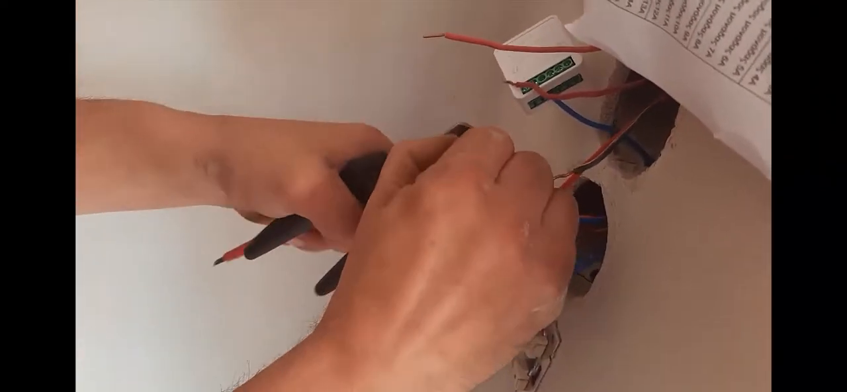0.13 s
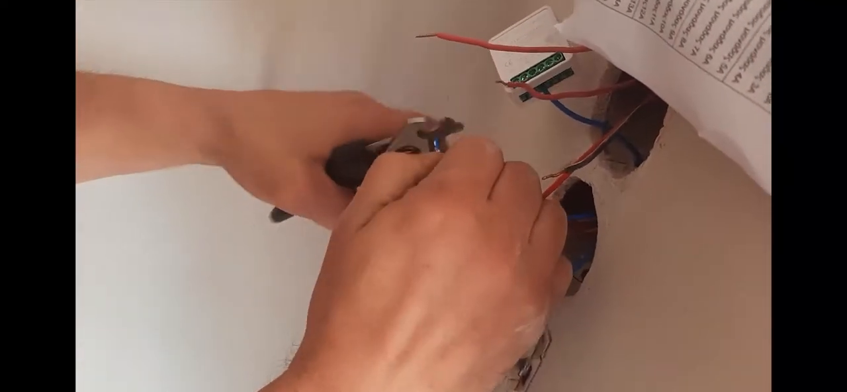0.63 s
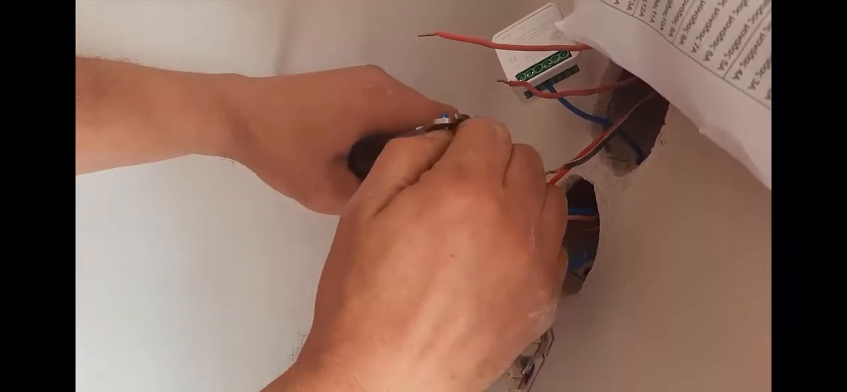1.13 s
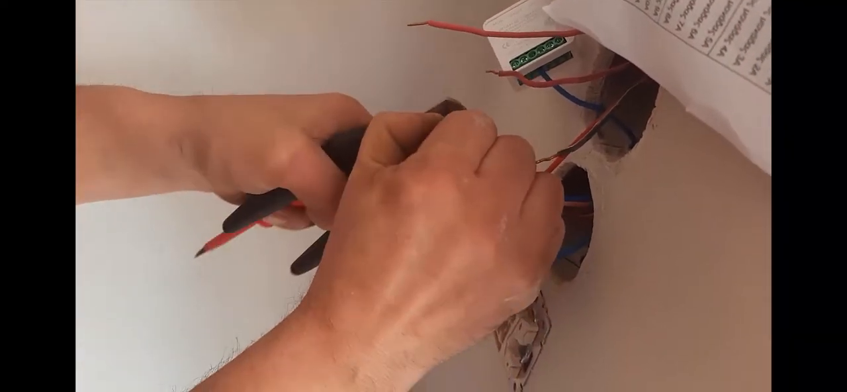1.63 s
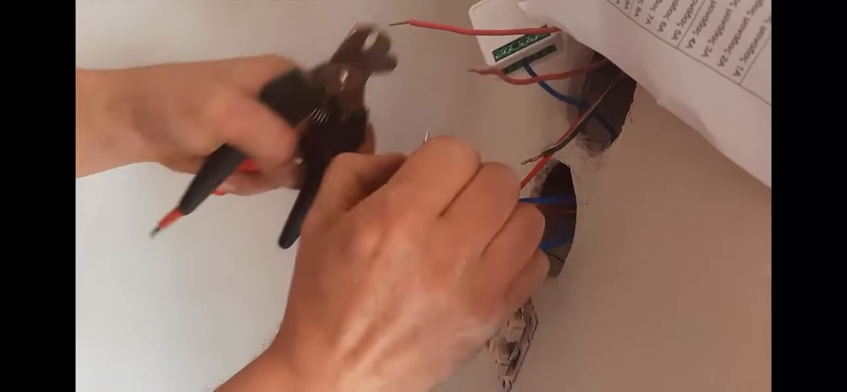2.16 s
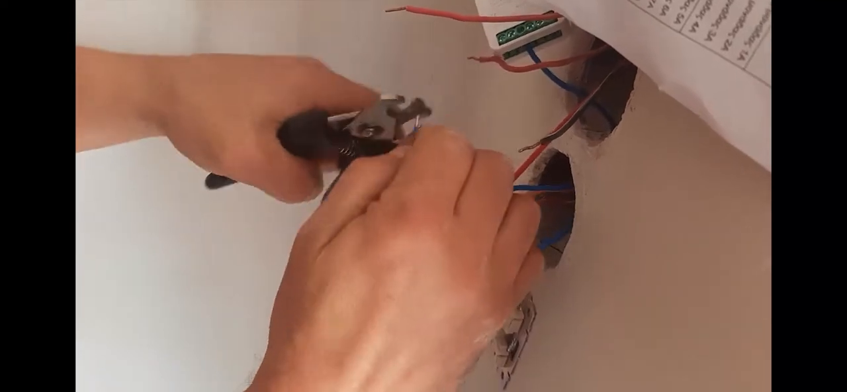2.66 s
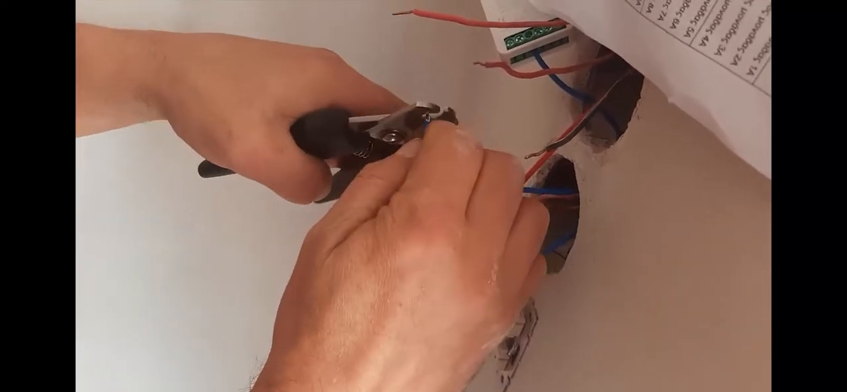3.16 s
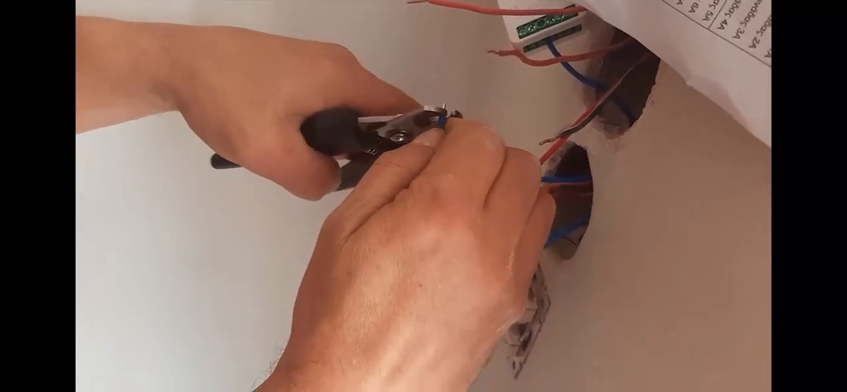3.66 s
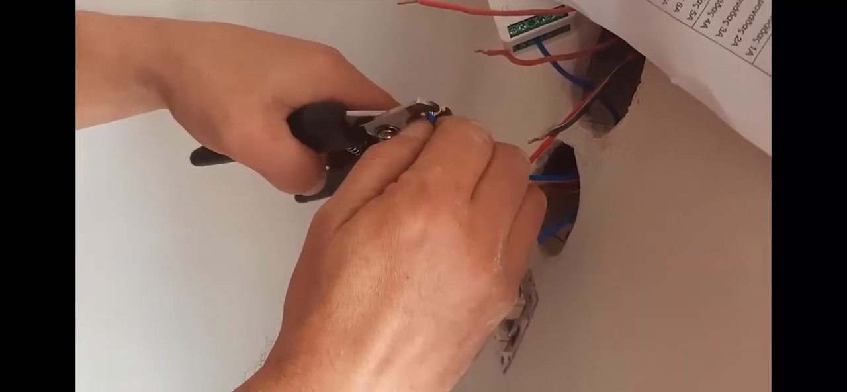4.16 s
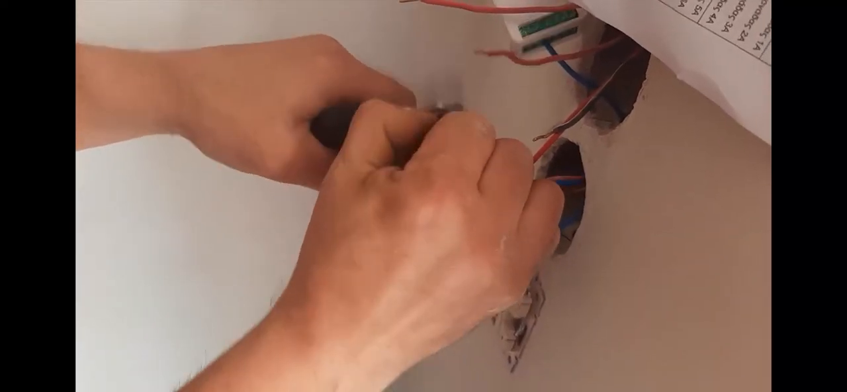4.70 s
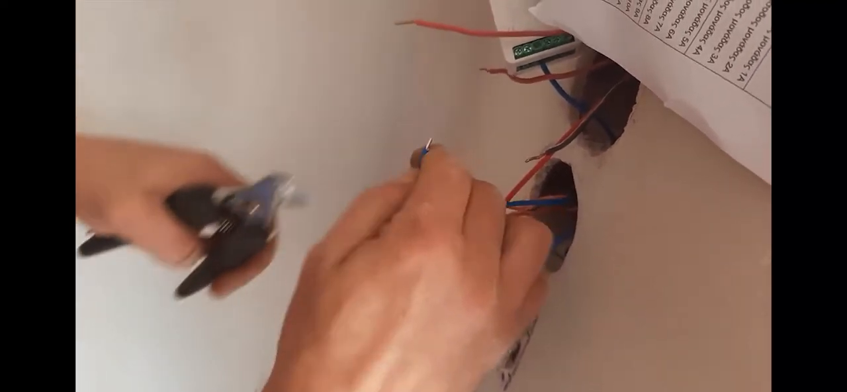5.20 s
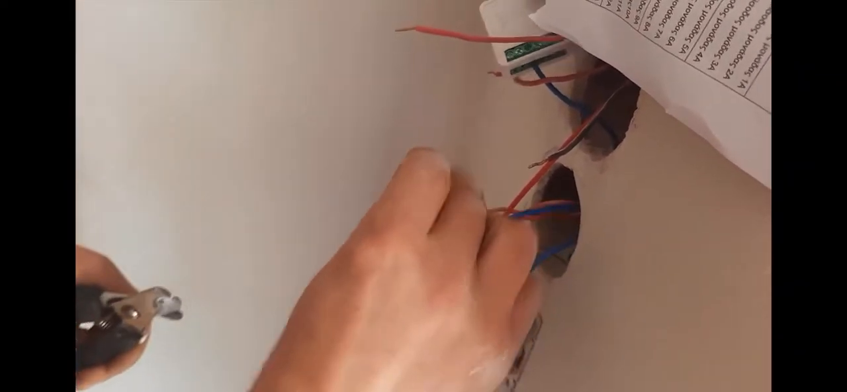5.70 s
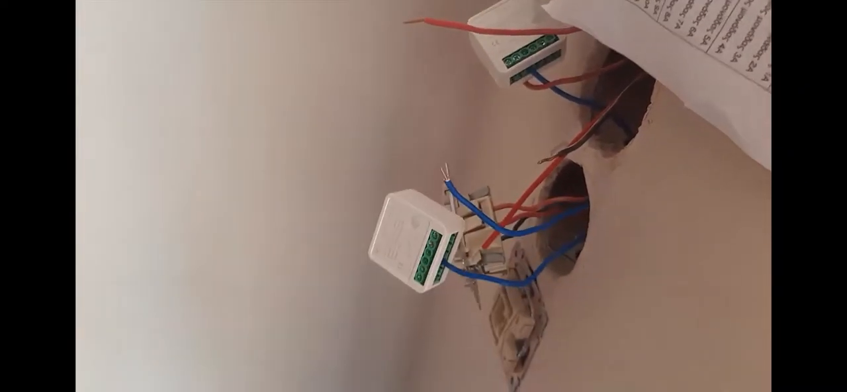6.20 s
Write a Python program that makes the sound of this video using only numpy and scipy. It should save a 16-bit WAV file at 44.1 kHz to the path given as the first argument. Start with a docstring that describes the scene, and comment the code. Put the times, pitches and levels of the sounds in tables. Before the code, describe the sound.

Close, sparse clicks, scrapes and hollow plastic knocks from electrical wiring work with pliers, bursts around two and five seconds over faint building rumble.

```python
"""Bare, hard room: pliers strip and crimp wires at a wall box, close to a phone with two unlike microphones.
Knocks and drag excite decaying box modes near 2 kHz and its odd multiples, mostly in the left microphone.
Ticks (noise snap plus short ring) and rubbing (hiss plus crackle) come through the air, brighter on the right.
Shaped noise gives the low rumble and hum of the building, swelling with thumps of handling; slow sines give
dull bumps of the hand."""
import sys
import numpy as np
from scipy import signal
from scipy.io import wavfile
from scipy.ndimage import uniform_filter1d

SR = 44100
rng = np.random.default_rng(int(sys.argv[2]) if len(sys.argv) > 2 else 0)


def volts(x):
    """Linear amplitude factor 10**(x/20) for a level x in dB, scalar or array-like."""
    e = np.asarray(x, float) / 20
    return 10 ** e


def file_out(sig):
    """Save sig as 16-bit WAV at sys.argv[1]."""
    # one column per channel
    cols = np.atleast_2d(sig).T
    # limit, then scale
    lim = np.clip(cols, -1, 1)
    pcm = np.round(lim * 32767).astype(np.int16)
    wavfile.write(sys.argv[1], SR, pcm)


N = 279153

# colour of rubbing and clatter in air: f/Hz, level/dB
RUSTLE_SPECTRUM = [(100, -3), (400, -18.5), (1200, -4.5), (3000, -4), (16000, -7.5)]
# left-right likeness of the noise layers: f/Hz, correlation/1
LIKENESS = [(60, .8), (200, 0.45), (400, 0.53), (700, 0.74), (1200, 0.091), (20000, .01)]
# faint handling between the pulls: t/s, rustle level/dB, drag level/dB
FAINT_HANDLING = [(0.0, -61.5, -86), (.85, -100, -85), (.95, -68.5, -84), (1.34, -75.5, -69.5),
                  (1.7, -73, -70.5), (1.92, -63.5, -70), (2.45, -70.5, -79), (2.9, -68, -78.5),
                  (3.85, -77.5, -81), (4.0, -73, -76), (4.32, -68.5, -95.5), (4.5, -74.5, -80.5),
                  (5.3, -70, -65), (6.33, -66.5, -69)]


def unit_rms(x):
    """Scales to rms 1."""
    return x / np.sqrt(np.mean(x ** 2) + 1e-20)


def spectrum_at(points, hz):
    """Table value at hz, interpolated over log frequency."""
    f, value = np.transpose(points)
    return np.interp(np.log(hz + 1), np.log(f + 1), value)


def curve(rows, column):
    """One dB column over time as a gain per sample."""
    rows = np.array(rows)
    return volts(np.interp(np.arange(N) / SR, rows[:, 0], rows[:, column]))


def add(mix, start_s, sound):
    """Mixes a sound in at start_s."""
    part = mix[max(round(start_s * SR), 0):][:len(sound)]
    part += sound[:len(part)]


def causal(points, size=2048):
    """Minimum-phase impulse response of a spectrum table."""
    hz = abs(np.fft.fftfreq(2 * size, 1 / SR))
    log_gain = np.log(volts(spectrum_at(points, hz)))
    return np.fft.ifft(np.exp(np.conj(signal.hilbert(log_gain)))).real[:size]


def through(x, taps):
    """Convolution cut to input length."""
    return signal.oaconvolve(x, taps)[:len(x)]


def shaped(points, patchy_db, likeness, size=1024):
    """Stereo noise of rms 1 from random short-time spectra with drifting patches; the shared part lags on the right."""
    lag_s = 0.00033
    frames, hz = 4 * N // size + 5, np.fft.rfftfreq(size, 1 / SR)
    a, b, c, d, patches = rng.standard_normal((frames, len(hz), 5)).T
    patches = uniform_filter1d(patches, 14, 0)  # over frequency
    patches = unit_rms(uniform_filter1d(patches, 18, 1))  # over time
    same = np.clip(spectrum_at(likeness, hz), -1, 1)[:, None]
    left = a + 1j * b
    lag = np.exp(-2j * np.pi * hz[:, None] * lag_s)
    right = lag * same * left + np.sqrt(1 - same ** 2) * (c + 1j * d)
    z = np.array([left, right])
    z *= volts(spectrum_at(points, hz)[:, None] + patchy_db * patches)
    noise = signal.istft(z, nperseg=size, noverlap=3 * size // 4)[1]
    return unit_rms(noise[:, :N])


def grains(per_s, spread_db):
    """Random stick-slip clicks, a few of them large; rms 1."""
    size_db = spread_db * np.minimum(rng.exponential(1, N), 4)
    size = volts(size_db) * rng.choice([-1, 1], N)
    return unit_rms(size * (rng.random(N) < per_s / SR))


def strokes(layer):
    """Gain of one layer of the pulls (0 rustle, 1 drag, 2 boom): fast rise, hold, decay linear in dB."""
    # pulls of hands and wire: t/s, hold/s, rustle in air level/dB, drag on the box level/dB, dull boom level/dB
    pulls = [(0.0, 0.0074, -51, -52, -58), (0.133, 0.087, -66, -76, -98), (0.337, 0.16, -57, -78, -71),
             (0.595, 0.022, -61, -78, -64), (0.712, 0.085, -64, -60, -95), (1.38, .01, -58, -70, -89),
             (1.442, 0.0078, -62.5, -81, -71), (1.869, 0.013, -72, -77, -58.5),
             (1.956, 0.049, -42.5, -59, -54.5), (2.152, 0.029, -37, -41, -50), (2.56, 0.046, -66, -58, -98),
             (4.67, 0.067, -66.5, -64, -72), (4.76, 0.08, -45.5, -41.5, -56),
             (4.949, 0.0096, -50, -59.5, -80), (5.078, 0.036, -54, -55, -74),
             (5.164, 0.03, -62.5, -65, -68), (5.407, 0.043, -65, -56, -80), (5.6, 0.0087, -57.5, -64, -63),
             (5.726, 0.0063, -45, -63, -70), (5.872, 0.026, -64, -67, -93), (6.042, 0.15, -56.5, -69, -62),
             (6.24, 0.046, -62.5, -77, -80)]
    # decay rates: rustle/(dB/s), drag/(dB/s), boom/(dB/s)
    fall_db_per_s = [198, 130, 150]
    rise_db_per_s = 1102.5
    t, gain = np.arange(0, N, 64) / SR, 0
    for s, hold_s, *db in pulls:
        rise_db = rise_db_per_s * np.maximum(s - t, 0)
        fall_db = fall_db_per_s[layer] * np.maximum(t - s - hold_s, 0)
        gain = gain + volts(db[layer] - rise_db - fall_db)
    return np.interp(np.arange(N) / SR, t, gain)


def room(x):
    """Sparse random-sign taps, each band with its own decay; three random tails take turns at a steady rate,
    so that the echo colour varies."""
    # decay: f/Hz, t60/s, t60 of the rooms beyond/s
    decay = np.array([(303, 0.31, 1.5), (940, 0.74, 0.61), (1500, 0.31, 0.86), (2000, 0.28, 2),
                      (2700, 0.31, 1.2), (6000, 0.26, 1.9), (13000, 0.25, .9)])
    beyond_db, turns_per_s = -25, 7
    taps = np.zeros((3, 2, SR))
    at = np.arange(200, SR - 20, 20) + rng.integers(0, 20, (3, 2, (SR - 201) // 20))
    np.put_along_axis(taps, at, rng.choice([-1., 1.], at.shape), 2)
    hz, t, z = signal.stft(taps, SR, nperseg=256)
    near_s, far_s = (spectrum_at(decay[:, [0, k]], hz)[:, None] for k in (1, 2))
    envelope = volts(-60 * t / near_s) + volts(beyond_db - 60 * t / far_s)
    tails = signal.istft(z * envelope, SR, nperseg=256)[1]
    tails /= np.linalg.norm(tails, axis=2, keepdims=True)
    phase = np.arange(N) * turns_per_s / SR + np.arange(3)[:, None] / 3
    turn = np.sqrt(2 / 3) * np.cos(2 * np.pi * phase)
    return sum(signal.oaconvolve(x * w, tail, axes=1)[:, :N] for w, tail in zip(turn, tails))


def building_and_thumps():
    """Low rumble and hum of the building as noise, swelling with thumps of handling; pulls boom in the hum band."""
    # building and handling thumps: t/s, rumble level/dB, hum level/dB
    levels = [(0.0, -51.5, -61), (0.3, -72, -65), (0.46, -53.5, -57.5), (0.65, -66.5, -63.5),
              (0.9, -60, -59.5), (1.14, -60.5, -57.5), (1.3, -67, -62.5), (1.85, -66, -59.5),
              (1.97, -49.5, -50.5), (2.17, -66, -57.5), (2.3, -67, -61.5), (2.89, -64, -64),
              (3.0, -60, -59.5), (3.28, -64, -62), (3.6, -52.5, -60.5), (3.95, -63.5, -63),
              (4.65, -64.5, -61), (4.8, -47, -62.5), (4.95, -64.5, -59.5), (5.6, -63, -64),
              (6.15, -66.5, -61.5), (6.33, -71, -63.5)]
    # rumble colour: f/Hz, level/dB
    rumble_spectrum = [(25, -47.5), (50, -19), (70, -4.5), (83, 3), (100, -18), (130, -1.5), (200, -18),
                       (300, -28), (20000, -112)]
    # hum colour: f/Hz, level/dB
    hum_spectrum = [(100, -29), (220, -4), (380, 5), (550, -1.5), (800, -8.5), (1500, -20.5), (3000, -38),
                    (20000, -52)]
    rumble = curve(levels, 1) * shaped(rumble_spectrum, 0.98, LIKENESS, size=4096)
    hum_gain = curve(levels, 2) + strokes(2)
    return rumble + hum_gain * shaped(hum_spectrum, 0.98, LIKENESS)


def bumps():
    """Soft pushes of the hand: each swings a few low cycles under a t*exp(-t) envelope."""
    # dull bumps: t/s, level/dB, f/Hz
    pushes = [(1.949, -43, 125), (4.799, -56, 77), (5.162, -38, 70), (5.166, -43, 170)]
    out, t = np.zeros(N), np.arange(6000) / SR
    for s, db, hz in pushes:
        envelope = t / 0.038 * np.exp(1 - t / 0.01)
        add(out, s - .01, 2 * volts(db) * np.sin(2 * np.pi * hz * t) * envelope)
    return out


def resonate(x, hz, width_hz):
    """Moving resonance: shifts the hz curve to zero, smooths by a double pole and shifts back."""
    turn, r = np.exp(2j * np.pi * np.cumsum(hz) / SR), np.exp(-np.pi * width_hz / SR)
    smooth = signal.lfilter([(1 - r) ** 2], [1, -2 * r, r ** 2], x / turn)
    return 2 * (turn * smooth).real


def rubbing():
    """Patchy hiss and fine stick-slip crackle; the faint handling adds a drifting bright band."""
    # the band sinks and starts over: t/s, f/Hz
    band_centre = [(0.0, 4100), (0.85, 4850), (0.95, 3480), (1.3, 4330), (1.8, 4600), (2.5, 4620),
                   (3.141, 4370), (3.17, 3310), (3.3, 3100), (3.33, 5900), (3.42, 5230), (3.65, 2800),
                   (3.69, 5700), (4.08, 5200), (4.11, 4660), (4.4, 2700), (4.43, 5200), (6.33, 4600)]
    crackle_db, patchy_db, band_gain, band_width_hz = 1.5, 3.5, 1.5, 1100
    crackle = volts(crackle_db) * through(grains(per_s=820, spread_db=3.5), causal(RUSTLE_SPECTRUM))
    hiss = shaped(RUSTLE_SPECTRUM, patchy_db, LIKENESS) + crackle
    centre_hz = np.interp(np.arange(N) / SR, *np.transpose(band_centre))
    bright = hiss + band_gain * resonate(hiss, centre_hz, band_width_hz)
    return strokes(0) * hiss + curve(FAINT_HANDLING, 1) * bright


def ticks():
    """Wire ends: each a 1 ms snap of noise and a short decaying ring."""
    # small dry ticks: t/s, level/dB, ring f/Hz
    snaps = [(0.1545, -54, 4470), (0.1807, -51.5, 5860), (0.3345, -50, 4140), (0.37, -41.5, 7100),
             (0.46, -44.5, 5700), (0.469, -44, 5700), (0.5864, -47, 5780), (1.3666, -38.5, 6000),
             (1.458, -51.5, 5500), (1.8741, -48.5, 4900), (1.943, -37.5, 4330), (2.0007, -35, 5600),
             (2.0516, -26.5, 6650), (2.114, -40, 5500), (2.1346, -34.5, 5000), (2.1468, -27.5, 5750),
             (2.453, -54, 4900), (3.1504, -57, 4600), (3.7298, -62, 4600), (3.936, -52, 5010),
             (4.5571, -56.5, 4460), (4.6095, -54, 4500), (4.793, -43, 6040), (4.8234, -33, 6400),
             (4.8584, -43, 6130), (5.1002, -50, 5270), (5.336, -65, 5500), (5.5704, -48, 4570),
             (5.5999, -43.5, 4600), (5.7244, -43, 5570), (5.7546, -35, 3500), (6.0636, -45, 4900),
             (6.1097, -40, 5400), (6.134, -32.5, 6100), (6.169, -40, 5400)]
    # tick colour: f/Hz, level/dB
    snap_spectrum = [(300, -19.5), (2000, 6.8), (4000, 8.6), (16000, 11.5)]
    out, t = np.zeros(N), np.arange(300) / SR
    for (s, db, hz), noise in zip(snaps, rng.standard_normal((len(snaps), 300))):
        ring = 0.5 * np.sin(2 * np.pi * hz * t) * np.exp(-t / 0.0029)
        tick = noise * np.exp(-t / 0.00113) + ring
        add(out, s, volts(db) * tick / abs(tick).max())
    return through(out, causal(snap_spectrum))


def box_ring(favoured_hz=2000, body_db=0):
    """Decaying box modes at both microphones; the place struck favours some, body_db boosts those below 1.5 kHz."""
    # modes of the hollow box: f/Hz, width/Hz, left level/dB, right level/dB
    box_modes = [(1000, 280, 2.5, 1), (1305, 60, -4.5, -11), (1752, 64, -1, -2), (1850, 42, 0, -6.5),
                 (2000, 91, 11.5, -6), (2190, 79, 5.5, -2), (2313, 124, 7, 5.5), (2800, 350, -35.5, -10),
                 (4254, 300, -40, -44), (5780, 66, -20, -25), (9750, 127, -20.5, -36),
                 (13460, 170, -21, -55)]
    t = np.arange(1500) / SR
    f, width_hz, *db = np.transpose(box_modes)[:, :, None]
    off_place_db = np.minimum(((f - favoured_hz) / 60.) ** 2, 10.5)
    favour_db = (f < 1500) * body_db - (f < 2600) * off_place_db
    # neighbours start opposed: the ring swells, holds, then beats
    sign = (-1.) ** np.arange(len(box_modes))[:, None]
    envelope = np.exp(-np.pi * width_hz * t) * (1 - np.exp(-t / 0.00032))
    modes = sign * volts(favour_db) * envelope * np.sin(2 * np.pi * f * t)
    highpass = signal.butter(2, 650, "high", fs=SR, output="sos")
    return signal.sosfilt(highpass, (volts(db) * modes).sum(1))


def scrape():
    """Wire dragging on the box: stick-slip grains through its modes."""
    drag_gain = curve(FAINT_HANDLING, 2) + strokes(1)
    slips = drag_gain * grains(per_s=500, spread_db=5.5)
    ring = box_ring()
    return np.array([through(slips, r) for r in ring]) / np.linalg.norm(ring[0])


def knocks():
    """Box ring and clatter into the room: a hard first contact, then random chatter while contact lasts."""
    # pliers and wire on the box: t/s, ring level/dB, clatter level/dB, favoured f/Hz, boost of modes below 1.5 kHz/dB
    blows = [(0.0024, -40, -20, 2010, 11.5), (0.0147, -39, -38, 1830, -16), (0.1523, -49, -30, 2030, 7),
             (0.18, -42, -43, 2110, 7), (0.215, -43, -62, 1920, 4.5), (0.345, -50, -17, 1920, -4),
             (0.372, -33.5, -13.5, 1880, -5), (0.3925, -31, -10, 1970, 2.5), (0.402, -34, -43, 2000, 5.5),
             (0.4312, -31.5, -47, 2100, 0), (0.443, -36, -10.5, 2130, 2), (0.4625, -34, -44, 2040, -18),
             (0.4733, -50, -33, 2000, 6), (0.587, -46.5, -30, 2170, 11), (0.737, -45, -22.5, 1900, 5),
             (0.777, -53, -60, 2120, -2), (0.7896, -50, -21.5, 1800, 5), (1.323, -56, -49, 1810, 4),
             (1.3675, -24, -24, 1877, -2), (1.4583, -31.5, -50, 2080, 2), (1.941, -28, -21, 2090, 9),
             (1.9554, -21.5, -30.5, 2173, 4.5), (1.963, -31, -43, 2150, 1.5), (1.9714, -44, -6.5, 2230, 4),
             (1.9882, -48, -6, 2080, -4), (2.0002, -27, -42, 2190, 1.5), (2.03, -34.5, -2.5, 2190, -1),
             (2.051, -29.5, -36.5, 2475, -7), (2.112, -35.5, -17.5, 2120, -6),
             (2.121, -31.5, -32, 2000, -3), (2.135, -14, -48, 2047, -2.5), (2.1424, -20, -31, 1850, -18),
             (2.165, -24, -37.5, 1970, -2), (2.2404, -29.5, -10.5, 2157, -24),
             (2.452, -46, -24, 2150, -7.8), (2.565, -43, -33, 2150, 4), (3.824, -61, -36, 2270, 8),
             (3.845, -63, -49, 2200, -4), (4.006, -57.5, -46, 2130, -1), (4.03, -63, -50, 2145, -7),
             (4.56, -58.5, -33.5, 2260, -3), (4.67, -47.5, -23.5, 2140, 9), (4.7295, -40, -10.5, 2020, 12),
             (4.756, -35.5, -42, 1880, 6), (4.7664, -38, -39, 2190, 6), (4.7925, -27, -23, 1800, -7),
             (4.802, -31, -3, 2060, -8), (4.8194, -28, -39.5, 1840, -9), (4.8543, -49, -11.5, 2000, -4),
             (4.875, -44, -36, 1850, -6), (4.9447, -45, -21, 1830, -13), (4.959, -38.5, -33, 1890, 6),
             (5.0766, -44.5, -19, 2250, 11), (5.1005, -55, -18, 1850, -1), (5.1377, -50, -34, 1960, -1),
             (5.16, -35.5, -48, 2167, 1.5), (5.312, -47, -22.5, 2230, 8), (5.3903, -38, -21.5, 2120, -0.5),
             (5.526, -41.5, -21, 1700, 1), (5.5683, -46.5, -53, 2400, 3), (5.6, -42.5, -38, 1740, 0),
             (5.7245, -41, -42, 2250, -4), (5.7444, -52, -17, 2200, 6), (5.754, -38, -17, 1730, 8),
             (5.972, -50, -21, 1020, 12), (6.0362, -55, -9, 1940, -10), (6.2637, -51, -50, 2280, -1)]
    contact_s, contact_spread_db, bounce_db = 0.0059, 1.5, -6.5
    lead_s = 0.0007
    box, clatter, t = np.zeros((N, 2)), np.zeros(N), np.arange(600) / SR
    chance = rng.standard_normal((len(blows), 2, 600))
    for (s, db, clatter_db, hz, body_db), (gate, size) in zip(blows, chance):
        length_s = contact_s * volts(contact_spread_db * size[0])
        chatter = volts(bounce_db) * size * (gate > 2.1) * np.exp(-(t / length_s) ** 2)
        chatter[0] = 0.68  # first contact
        ring = signal.oaconvolve(chatter[None], box_ring(hz, body_db), axes=1)
        add(box, s - lead_s, 2 * volts(db) * ring.T / abs(ring[0]).max())
        add(clatter, s - lead_s, volts(clatter_db) * chatter / np.linalg.norm(chatter))
    return box.T, clatter


def scene():
    """The box path keeps its own colour; all else passes the microphone ports."""
    # left microphone colour for sound in air: f/Hz, gain/dB
    left_port = [(40, -5), (400, -4), (800, -14), (1400, -6), (2000, 6), (2500, -7.5), (3200, -38.5),
                 (4600, -19), (5300, -36), (5900, -32), (7500, -57), (9800, -22), (11500, -41),
                 (13500, -27), (16000, -35)]
    # right microphone colour for sound in air: f/Hz, gain/dB
    right_port = [(40, -7.5), (100, -24), (200, -12.5), (330, -3), (3000, 2), (5000, 2.5), (5800, 6),
                  (7000, -6), (7700, -13), (16000, -11.5)]
    right_lag_s = 0.006
    box, clatter = knocks()
    # the right microphone faces away and hears a wall echo first
    late = np.r_[np.zeros(round(right_lag_s * SR)), 1]
    box = box + scrape()
    box = np.array([box[0], through(box[1], late)])
    box = box * volts([[-.1], [-6]]) + room(box) * volts([[-9], [1.1]])  # left, right
    clatter, snaps = through(clatter, causal(RUSTLE_SPECTRUM)), ticks()
    wet = room(np.array([clatter, through(clatter, late)]) + volts(-6.5) * snaps)
    air = snaps + wet + rubbing() + building_and_thumps() + bumps()
    return box + np.array([through(air[0], causal(left_port)), through(air[1], causal(right_port))])


def top_cut(x):
    """Nothing passes above the cut-off."""
    return signal.sosfilt(signal.butter(12, 16550, fs=SR, output="sos"), x)


def record(dry):
    """Adds faint white hiss of the electronics, then a linear-phase band limit."""
    self_noise_db, edge_hz = -84.5, 15900
    hissy = dry + volts(self_noise_db) * rng.standard_normal(dry.shape)
    edge = signal.firwin(511, edge_hz, window=("kaiser", 9), fs=SR)
    mix = signal.oaconvolve(hissy, edge[None], "same", axes=1)
    return top_cut(mix)


dry = scene()
out = record(dry)
file_out(out)
```